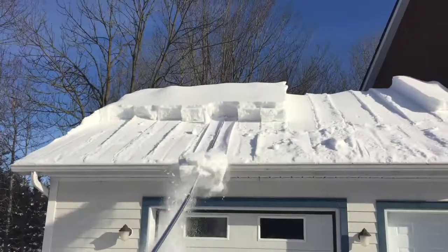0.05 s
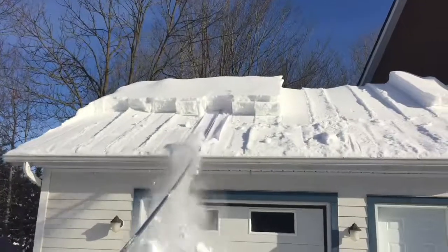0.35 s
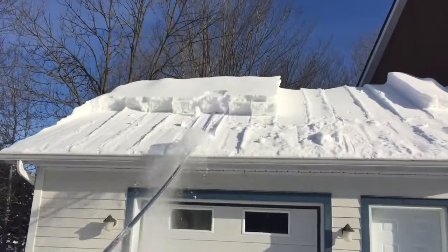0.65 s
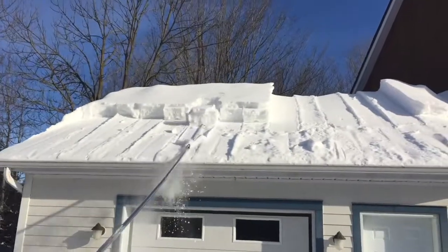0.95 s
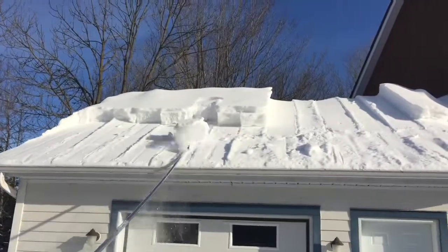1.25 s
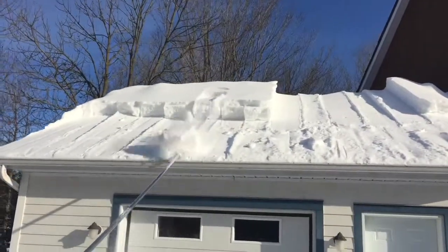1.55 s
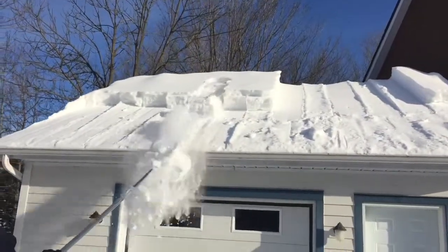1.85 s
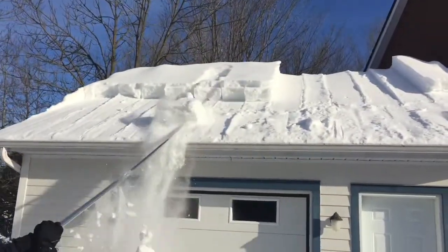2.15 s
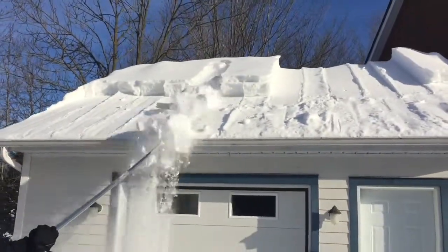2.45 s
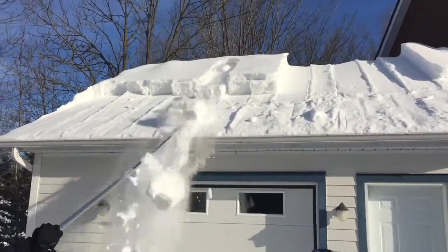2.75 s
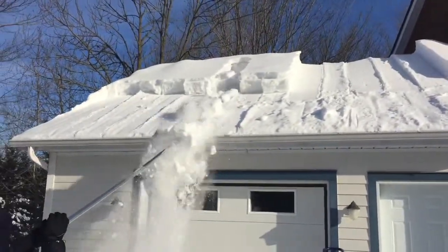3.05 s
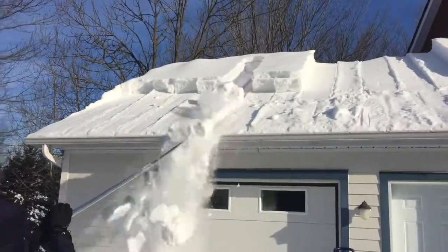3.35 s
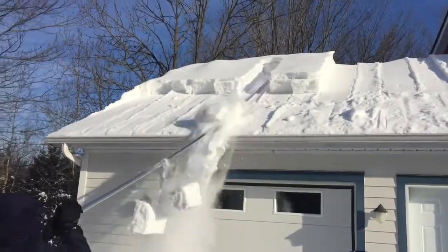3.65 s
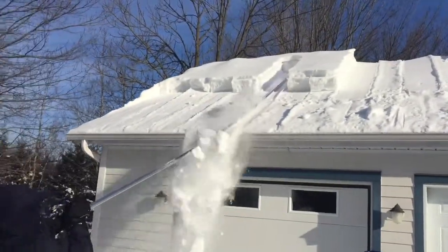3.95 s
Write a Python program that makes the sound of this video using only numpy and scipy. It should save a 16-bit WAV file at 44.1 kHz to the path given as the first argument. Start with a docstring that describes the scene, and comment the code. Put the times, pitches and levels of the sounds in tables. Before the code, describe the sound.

Snow slides off a roof with a grainy hiss and rustle, strongest for the first 1.4 seconds and fainter after 2.3. Crumbs patter and lumps knock throughout, between short scrapes of a long-handled tool. Soft slabs thud near 0.7, 1.2 and 2.5 seconds, and powder sprays brightly at 2. From 3 seconds the heap rumbles low, with thuds at 3.2 and 3.7, over faint outdoor air.

```python
"""First comes the hiss and patter of snow sliding down a roof and pouring off its edge, as a
long-handled snow cutter is pushed up the slope. Lumps knock and soft slabs thud into the snow below,
between short scrapes and sprays of powder. Travelling over snow delays the bass, so each crumb and
lump lands with a short falling chirp. Heard in mono, in open air."""
import sys
import numpy as np
from scipy import signal
from scipy.fft import rfft, irfft
from scipy.io import wavfile

SR = 44100
rng = np.random.default_rng(int(sys.argv[2]) if len(sys.argv) > 2 else 0)


def store_pcm(level_fs):
    """Save levels as 16-bit WAV."""
    pcm = np.round(np.clip(level_fs, -1, 1) * 32767).astype(np.int16)
    wavfile.write(sys.argv[1], SR, np.atleast_2d(pcm).T)


N = 176400
T = np.arange(N) / SR
HZ = np.fft.rfftfreq(N, 1 / SR)

# loudness of the sliding snow: t/s, fine hiss level/dB, coarse rustle level/dB
SLIDE_LEVELS = [(0, -58, -53.5), (.23, -52, -53), (.7, -53, -54.5), (.86, -55, -54.5), (1.14, -55, -51.5),
                (1.25, -52.5, -51), (1.36, -57, -52), (1.45, -65, -58.5), (1.71, -59.5, -55.5),
                (1.79, -65.5, -61), (1.93, -53.5, -57.5), (2.035, -63, -56.5), (2.29, -61.5, -58),
                (2.33, -71.5, -73), (2.41, -68.5, -60.5), (2.54, -72, -72), (2.7, -77.5, -69),
                (3.15, -75, -69.5), (3.3, -70, -71), (3.39, -77, -66.5), (3.48, -73, -68),
                (3.6, -67, -63.5), (3.69, -71, -71), (3.83, -71, -73), (4, -73, -71.5)]
# loudness of the falling crumbs: t/s, coarse relative level/dB, fine relative level/dB
CRUMB_LEVELS = [(0, -55, -49), (.2, -52, -50.5), (.3, -43, -54), (.47, -55.5, -54.5), (.63, -59, -81),
                (.7, -46, -57), (.87, -52.5, -59), (1.03, -51, -54.5), (1.3, -56.5, -52.5),
                (1.53, -53.5, -59.5), (1.7, -46.5, -52), (1.8, -58, -55.5), (1.96, -45.5, -50),
                (2.08, -69, -52.5), (2.3, -56.5, -65.5), (2.6, -57.5, -67.5), (2.67, -63, -55),
                (2.9, -67, -67), (3.13, -71, -61.5), (3.39, -49, -57), (3.47, -69, -62.5),
                (3.54, -47.5, -58.5), (3.67, -65, -71.5), (4, -52.5, -64)]
# rumble of the heap under the falling snow: t/s, level/dB
HEAP_LEVELS = [(0, -64), (2.9, -76), (3.12, -56.5), (3.38, -56.5), (3.47, -70), (3.63, -53.5), (4, -55)]
# lumps landing: t/s, level/dB, f/Hz
LUMP_HITS = [(.009, -39, 288), (0.048, -36.5, 620), (0.081, -45, 400), (0.146, -33, 1600),
             (.15, -33.5, 900), (0.159, -35.5, 1300), (0.391, -28.5, 392), (.422, -40, 500),
             (0.666, -42, 254), (.716, -32.5, 560), (.754, -39, 242), (0.802, -37.5, 430), (.896, -40, 350),
             (0.94, -35.5, 686), (1.018, -34, 228), (1.089, -37, 435), (1.165, -38, 443), (1.208, -34, 190),
             (1.226, -35, 268), (1.291, -37, 510), (1.427, -41.5, 246), (1.518, -45, 337),
             (1.579, -36.5, 274), (1.687, -39, 330), (1.72, -40.5, 400), (1.874, -40.5, 350),
             (1.904, -46, 380), (1.959, -37, 305), (1.977, -43, 450), (2.163, -46, 750),
             (2.251, -44.5, 178), (2.345, -37, 1120), (2.393, -44, 655), (2.397, -40.5, 166),
             (2.449, -37, 167), (2.647, -45.5, 1310), (2.798, -47, 500), (2.859, -55, 650),
             (3.063, -47, 593), (3.179, -40, 414), (3.188, -38.5, 200), (3.374, -43, 540),
             (3.378, -41.5, 176), (3.503, -49, 600), (3.521, -43, 336), (3.582, -40, 246),
             (3.797, -49.5, 650), (3.872, -47, 300)]
# scrapes along the roof, and a brief bright grating within the crunch of knocks at 0.145 s: start t/s,
# length/s, level/dB, first f/Hz, last f/Hz
ROOF_SCRAPES = [(0.145, 0.03, -50, 3020, 3860), (0.252, 0.092, -51.5, 743, 550),
                (1.243, 0.16, -53, 2996, 2000), (1.543, 0.054, -60, 3600, 3750),
                (2.115, 0.077, -60.5, 2000, 3100), (2.224, 0.1, -62.5, 3590, 4270),
                (2.645, 0.14, -66, 1486, 1096), (3.935, 0.069, -69, 1545, 2100)]
# slabs bursting on the ground: peak t/s, half length/s, thud level/dB, thud f/Hz, powder level/dB
SLAB_HITS = [(0.174, 0.016, -49, 62, -60), (0.27, 0.021, -54, 70, -69), (0.711, 0.027, -38.5, 88.5, -50.5),
             (1.215, 0.017, -43, 159.5, -52.5), (2.168, 0.017, -49.5, 61, -58),
             (2.456, 0.019, -39, 80.6, -49.5), (2.581, 0.016, -51, 58, -67), (3.243, 0.018, -34, 76, -50),
             (3.745, 0.021, -41.5, 83, -50)]
# short sprays of powder: t/s, level/dB
SPRAY_HITS = [(1.544, -56), (2.048, -45.5), (2.576, -63.5), (2.685, -62)]
# tone of the fine hiss, coarse rustle, mist, outdoor air and a slab's puff: f/Hz, relative level/dB
HISS_TONE = [(1500, -10), (3500, 3), (6200, 0.3), (8000, -4.5), (9500, -5), (12000, -10.5), (16000, -18.5)]
RUSTLE_TONE = [(300, -18), (800, -7.5), (1600, -0.5), (3200, -2), (4500, -6.5), (8000, -57), (16000, -62)]
MIST_TONE = [(5000, -28), (9000, -0.5), (12000, 0.5), (16000, 3)]
AIR_TONE = [(20, 3), (60, 2), (200, 7.5), (500, -13.5), (1500, -14.5), (5000, -36)]
PUFF_TONE = [(200, -23), (800, 2.5), (2000, -0.5), (4000, 1), (6500, -4.5), (9000, -7.5), (12000, -9),
             (16000, -11.5)]
# how the microphone lifts or lowers each pitch: f/Hz, level/dB
MIC_TONE = [(32, -11), (48, 0), (4300, -2), (4800, -2.5), (5300, 1.5), (9700, 3.5), (10300, -1), (11000, 4)]


def amp(db):
    """Turns decibels into a number to multiply a sound by."""
    return 10 ** (np.asarray(db) / 20)


def unit(x):
    """Scales a signal to an average strength (rms) of one."""
    return x / np.sqrt(np.mean(x ** 2) + 1e-20)


def add(mix, start_s, sound):
    """Mixes a sound in at the given time."""
    part = mix[max(round(start_s * SR), 0):][:len(sound)]
    part += sound[:len(part)]


def colour(x, tone):
    """Makes each frequency louder or softer, following a tone table."""
    hz, db = np.transpose(tone)
    return irfft(rfft(x) * amp(np.interp(np.log(HZ + 1), np.log(hz), db)), N)


def level(table, column):
    """Joins the points in one column of a table into a loudness curve."""
    rows = np.array(table)
    return amp(np.interp(T, rows[:, 0], rows[:, column]))


def wander(rate_hz):
    """A smooth random wobble; a higher rate makes it quicker."""
    return unit(irfft(rfft(rng.standard_normal(N)) * np.exp(-(HZ / rate_hz) ** 2), N))


def grains(per_s, spread_db):
    """Random clicks; a spread other than zero makes their sizes uneven."""
    size = amp(spread_db * np.minimum(rng.exponential(1, N), 3))
    return unit(size * rng.choice([-1, 1], N) * (rng.random(N) < per_s / SR))


def patchy(x, patch_db, long_s, wide_hz, size=1024):
    """Lets the tone shift in random patches as the snow tumbles."""
    frames = dict(nperseg=size, noverlap=size * 3 // 4)
    spectra = signal.stft(x, **frames)[2]
    patches = rng.standard_normal(spectra.shape[::-1]).T
    # blur across pitch, then across time
    for axis, span in enumerate([wide_hz * size / SR, long_s * SR * 4 / size]):
        blur = np.exp(-.5 * (np.arange(-20, 21) / span) ** 2)
        patches = signal.fftconvolve(patches, np.expand_dims(blur, 1 - axis), "same", axes=axis)
    return unit(signal.istft(spectra * amp(patch_db * unit(patches)), **frames)[1][:N])


def sliding_snow():
    """Ice grains rub and pour: a fine hiss, a coarser and patchier rustle, and a smooth mist of powder."""
    hiss = colour(grains(per_s=14000, spread_db=0), HISS_TONE)
    hiss = patchy(hiss, patch_db=1.5, long_s=0.0073, wide_hz=90)
    rustle = colour(grains(per_s=5000, spread_db=1.5), RUSTLE_TONE)
    rustle = patchy(rustle, patch_db=2.5, long_s=0.0075, wide_hz=69)
    mist = unit(colour(rng.standard_normal(N), MIST_TONE))
    hiss_gain = level(SLIDE_LEVELS, column=1) * amp(0.72 * wander(39))
    rustle_gain = level(SLIDE_LEVELS, column=2) * amp(wander(38))
    mist_gain = amp(-34.5) * hiss_gain ** 0.52  # follows the hiss, with gentler swings
    return hiss * hiss_gain + rustle * rustle_gain + mist * mist_gain


def landing(hz, octaves=0.86, size=4096):
    """One soft hit whose bass arrives late, making a falling chirp; its peak is one."""
    soft_hz, light_hz = 2570, 110.5  # too soft to click above the first, too light to boom below the second
    delay_cycles = 1.1  # each frequency is late by this many of its own swings
    f = np.fft.rfftfreq(size, 1 / SR) + 1
    band = np.exp(-.5 * (np.log2(f / hz) / octaves) ** 2) / np.sqrt(f)
    band /= np.hypot(1, (f / soft_hz + light_hz / f) ** 4)
    # a 1 dB ripple gives each landing a tone of its own
    ripple = amp(np.cos(2 * np.pi * (f * rng.uniform(0.54, 1.87) / hz / 2 + rng.random())))
    late_bass = np.exp(-2j * np.pi * (delay_cycles * np.log(f) + rng.random()))
    hit = irfft(band * ripple * late_bass)
    return hit / abs(hit).max()


def shower(hz, octaves, per_s, spread_db, count=12):
    """Many small landings at assorted pitches: each random click sets one off."""
    out = np.zeros(N)
    for pitch in hz * 2 ** (octaves * np.linspace(-1, 1, count)):
        out += signal.oaconvolve(grains(per_s / count, spread_db), unit(landing(pitch)))[:N]
    return unit(out)


def crumbs(clump_db=3.0):
    """Crumbs patter down from the roof's edge, the fine ones in clumps."""
    coarse = shower(hz=206, octaves=0.44, per_s=300, spread_db=2.5)
    fine = shower(hz=746, octaves=0.9, per_s=480, spread_db=1.7)
    fine = unit(fine * amp(clump_db * wander(rate_hz=26)))
    return amp(-2) * (coarse * level(CRUMB_LEVELS, column=1) + fine * level(CRUMB_LEVELS, column=2))


def dull_noise(hz, octaves):
    """Noise in a band around one pitch."""
    band = np.exp(-.5 * (np.log2((HZ + 1) / hz) / octaves) ** 2) / np.sqrt(HZ + 1)
    return unit(irfft(band * np.exp(2j * np.pi * rng.random(len(HZ))), N))


def heap_rumble():
    """The heap rumbles where the stream of snow lands."""
    return dull_noise(hz=84.3, octaves=0.58) * level(HEAP_LEVELS, column=1)


def outdoor_air():
    """Open air adds a faint, low, steady rush."""
    return amp(-62) * unit(colour(rng.standard_normal(N), AIR_TONE))


def lumps(crumple_after_s=0.0015, piece_within_s=0.01107):
    """A firm lump knocks on the snow, crumples softly, and sheds a piece that lands just after."""
    out = np.zeros(N)
    for t, db, hz in LUMP_HITS:
        add(out, t, amp(db) * landing(hz))
        add(out, t + crumple_after_s, amp(db - 3) * landing(hz=226, octaves=0.61))
        piece_t = t + piece_within_s * rng.random()
        add(out, piece_t, amp(db - 6.5) * landing(hz * rng.uniform(0.44, 1)))
    return out


def scrapes(slips_per_s=60, slip_fade_cycles=0.17):
    """Snow sticks and slips in uneven jerks; the rubbing pitch glides with the speed of sliding."""
    out = np.zeros(N)
    for t, length_s, db, first_hz, last_hz in ROOF_SCRAPES:
        n = round(length_s * SR)
        progress = np.linspace(0, 1, n)
        angle = 2 * np.pi * np.cumsum(first_hz + (last_hz - first_hz) * progress) / SR
        tones = np.exp(1j * angle) + amp(-10) * np.exp(1j * 1.55 * angle)  # the second is higher and weaker
        width_hz = 190 + 0.061 * first_hz
        smear = (wander(width_hz) + 1j * wander(width_hz))[:n]  # turns each tone into a band of noise
        slips = np.cumsum(slips_per_s * np.exp(.5 * wander(slips_per_s)[:n])) / SR
        jerks = 0.56 + np.exp(-(slips % 1) / slip_fade_cycles)  # some rubbing goes on between slips
        fade_out = np.minimum(10 * (1 - progress), 1)
        add(out, t, amp(db) * unit((smear * tones).real * jerks * fade_out))
    return out


def slabs(boom_share=0.37, fall_octaves=0.25, settle_db=-14, settle_s=0.096):
    """A slab crumples with a falling boom and a puff of powder, then loose snow settles."""
    out = np.zeros(N)
    puff = unit(colour(grains(per_s=8200, spread_db=1), PUFF_TONE))
    for t, half_s, thud_db, hz, puff_db in SLAB_HITS:
        from_peak = (T - t) / half_s  # counted in half lengths
        settling = amp(settle_db) * (from_peak > 0) * np.exp(-abs(T - t) / settle_s)
        swell = np.maximum(np.exp(-.5 * from_peak ** 2), settling)
        boom_hz = hz * 2 ** (-fall_octaves * np.clip(from_peak, -2, 1))
        boom = np.sin(2 * np.pi * (np.cumsum(boom_hz) / SR + rng.random()))
        crumple = dull_noise(hz * 1.33, octaves=1.0)
        thud = np.sqrt(2 * boom_share) * boom + np.sqrt(1 - boom_share) * crumple
        out += swell * (amp(thud_db) * thud + amp(puff_db) * puff)
    return out


def sprays(rise_s=0.0029, fade_s=0.016):
    """Small handfuls of powder strike with a brief, bright hiss."""
    bursts = np.zeros(N)
    for t, db in SPRAY_HITS:
        add(bursts, t, amp(db) * np.minimum(T / rise_s, 1) * np.exp(-T / fade_s))
    return bursts * unit(colour(grains(per_s=6400, spread_db=-2), HISS_TONE))


def scene():
    """All the snow over faint outdoor air, the same in both channels."""
    mono = outdoor_air() + sliding_snow() + crumbs() + heap_rumble()
    mono += lumps() + slabs() + scrapes() + sprays()
    return np.array([mono, mono])


def record(dry, top_hz=15850):
    """The microphone colours the sound, then the very highest treble is cut off."""
    heard = np.array([colour(channel, MIC_TONE) for channel in dry])
    treble_cut = signal.firwin(511, top_hz, window=("kaiser", 9), fs=SR)
    return signal.oaconvolve(heard, treble_cut[None], "same")


dry = scene()
out = record(dry)
store_pcm(out)
```